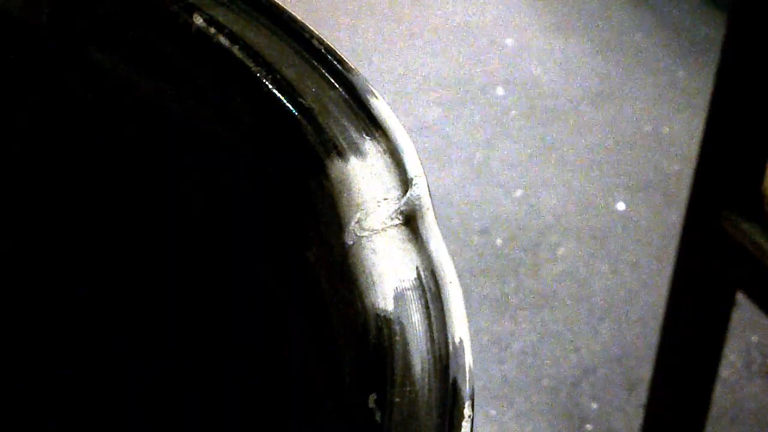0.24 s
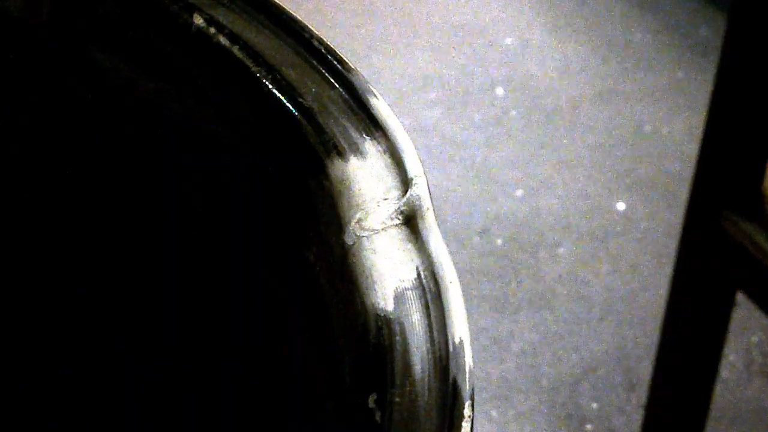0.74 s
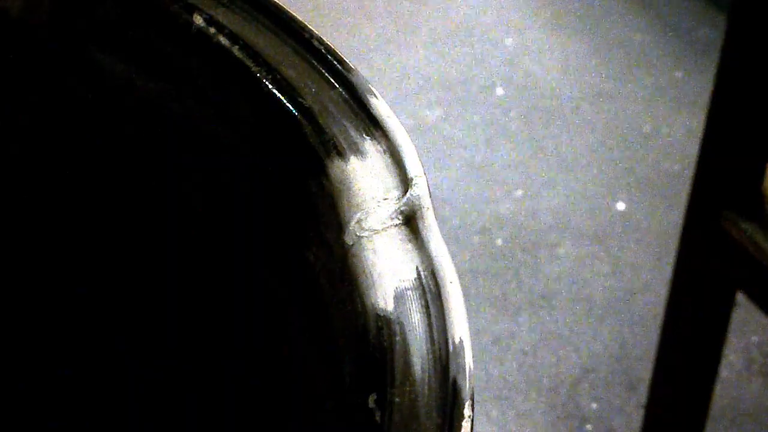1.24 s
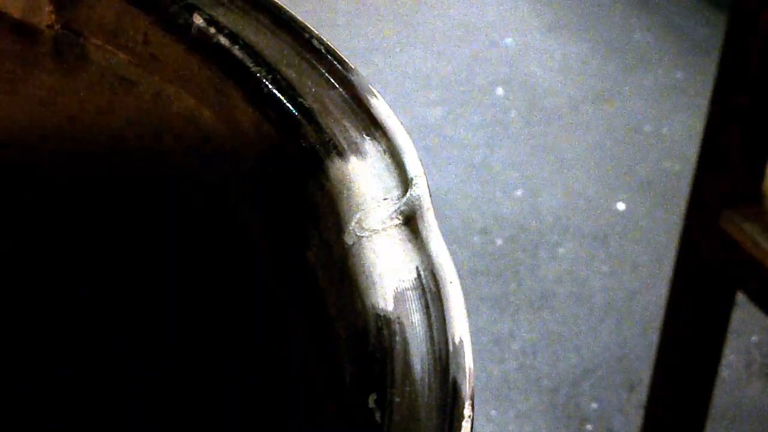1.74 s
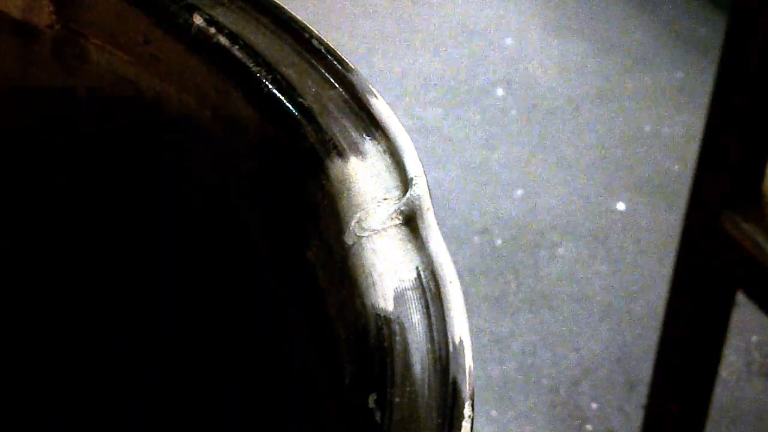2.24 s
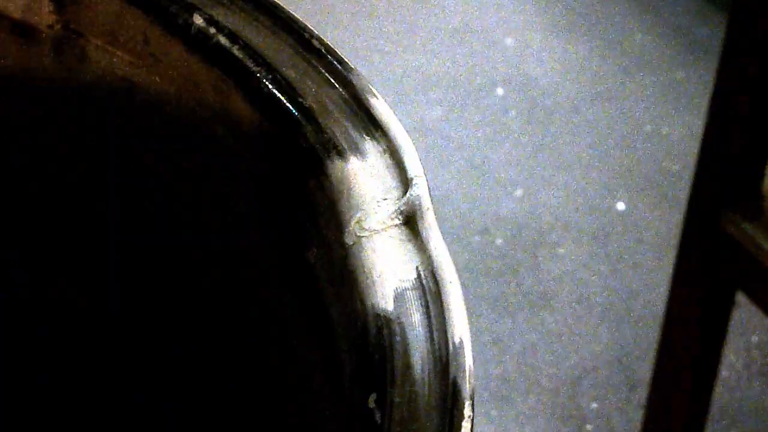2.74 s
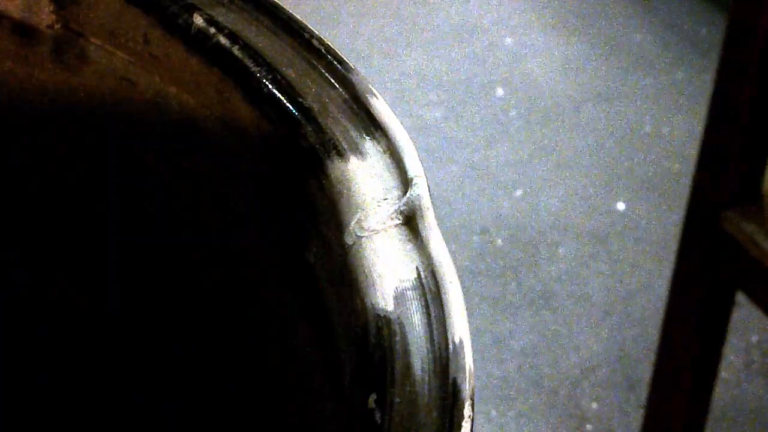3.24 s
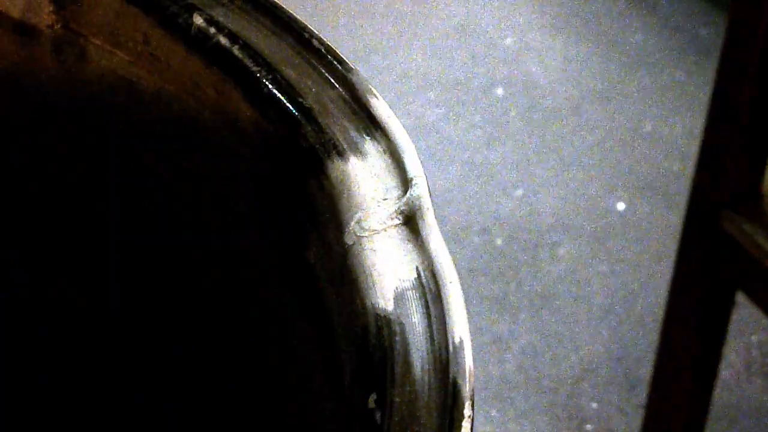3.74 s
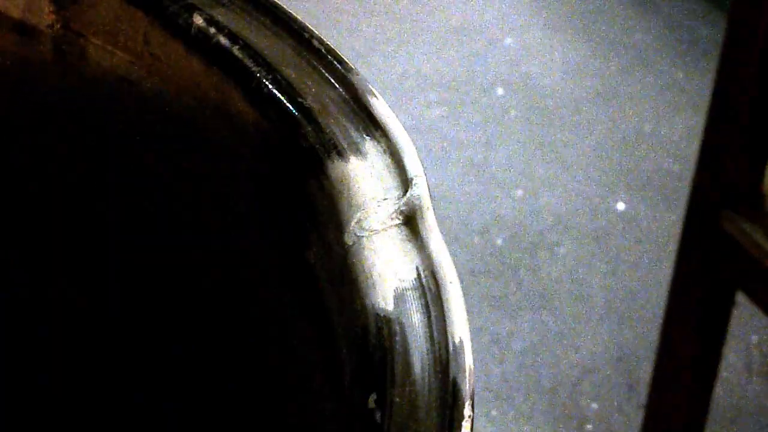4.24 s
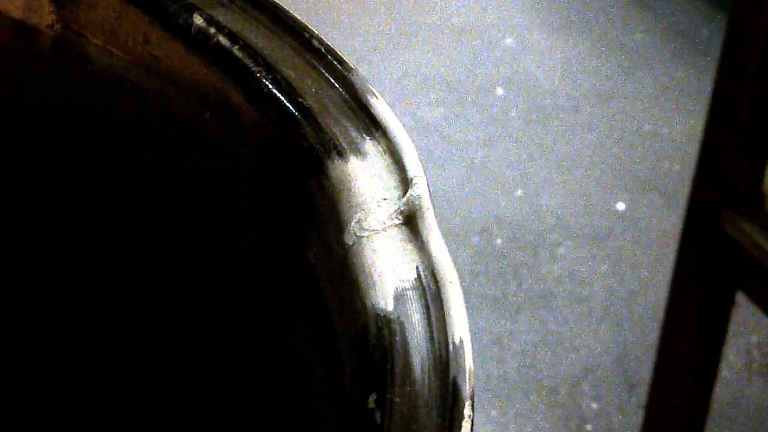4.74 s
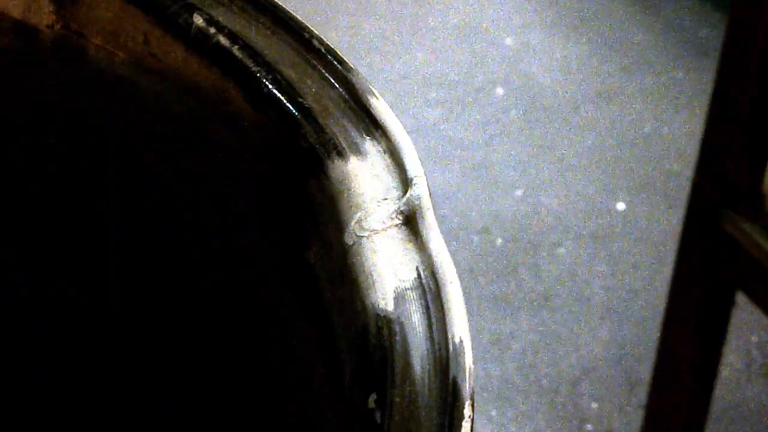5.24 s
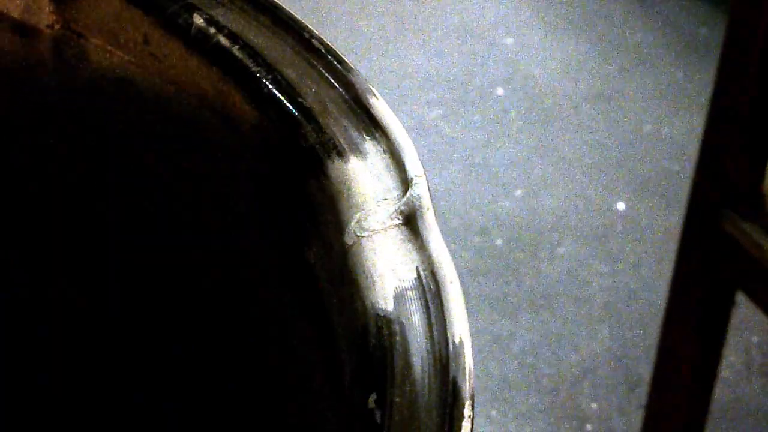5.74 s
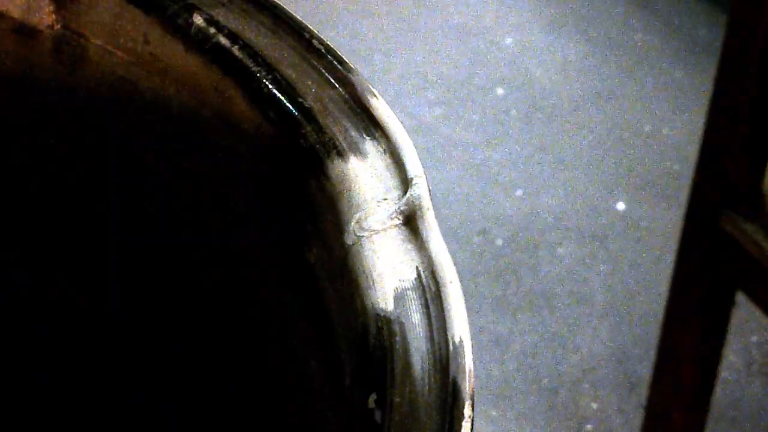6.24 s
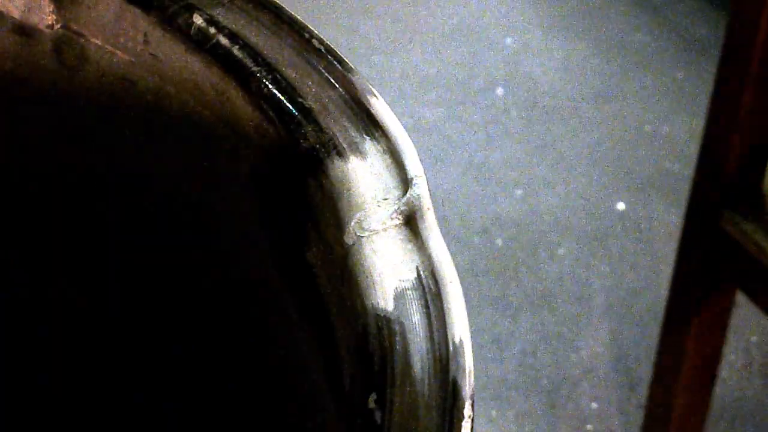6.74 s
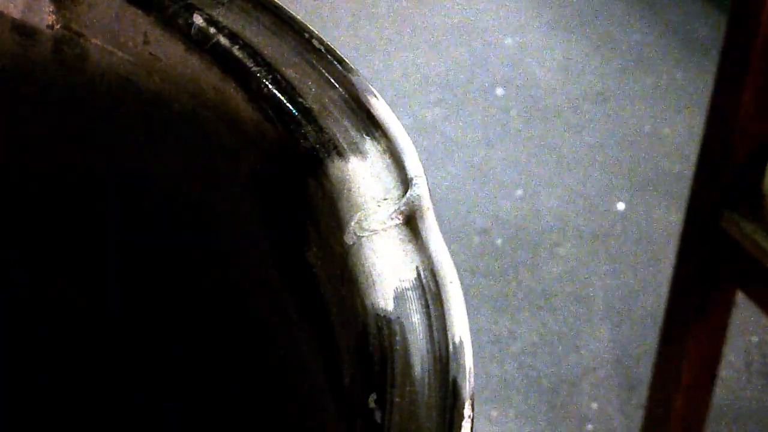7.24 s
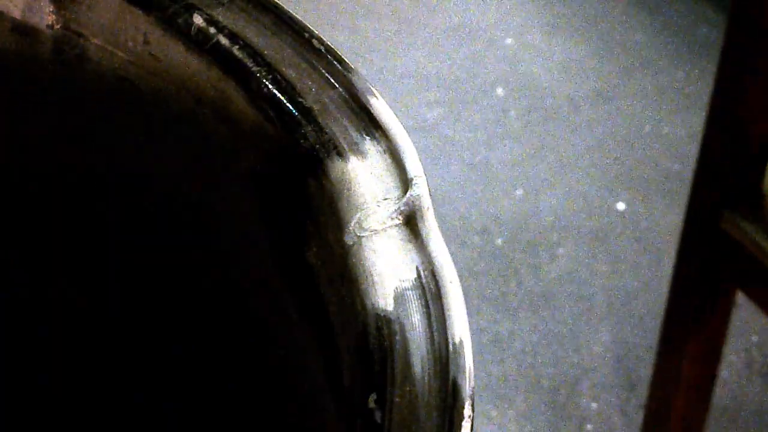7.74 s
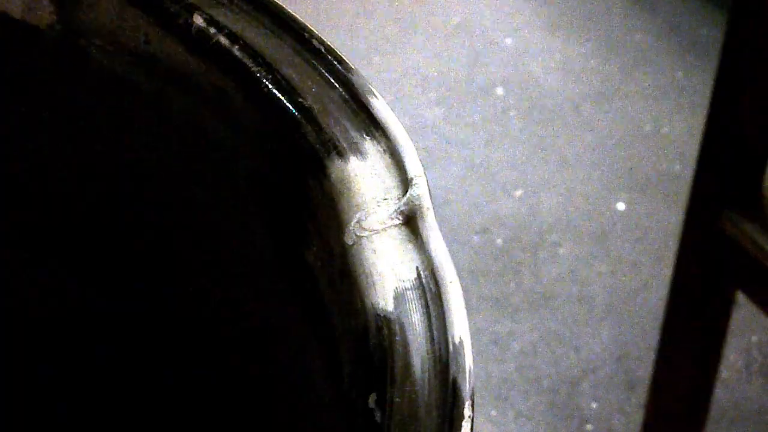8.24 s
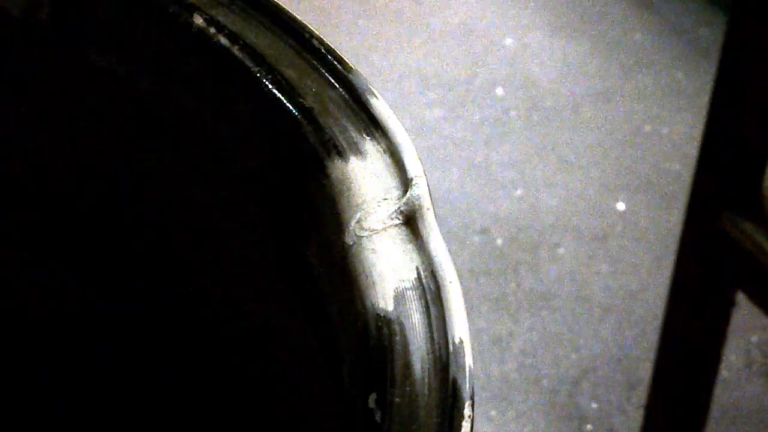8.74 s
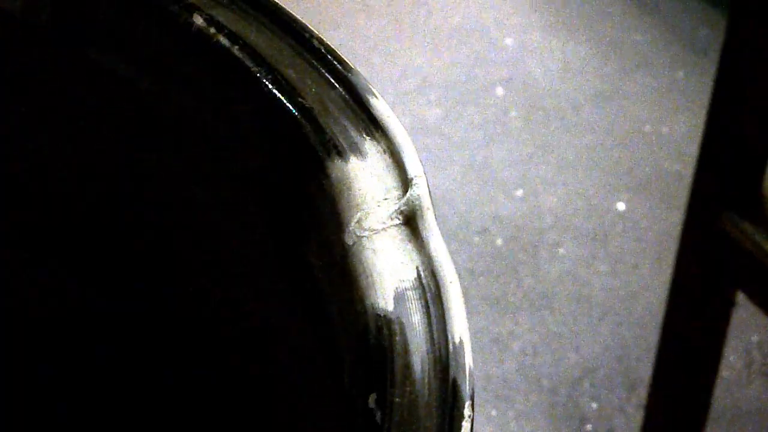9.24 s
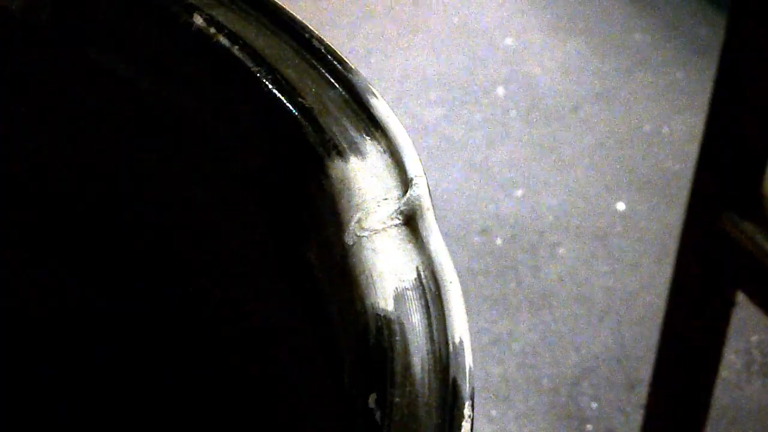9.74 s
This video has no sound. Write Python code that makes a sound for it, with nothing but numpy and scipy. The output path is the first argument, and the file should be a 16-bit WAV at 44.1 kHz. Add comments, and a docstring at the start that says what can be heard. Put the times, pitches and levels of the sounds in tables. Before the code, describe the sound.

A faint hum and room noise fill a workshop, heard through one small microphone. At about 0.5 seconds, gas seeps from a torch tip with a few tiny spurts. At 1.2 seconds it lights with a sharp pop, a crack over a low thump that rings briefly in the room. A soft flame roar follows, along with a thin, rapidly fluttering hiss. The flame sinks until about 2.5 seconds, then recovers and burns steadily with a light fizz from 3.5 seconds. Around 6.3 seconds oxygen opens: the flutter stops, the soft roar fades and a smooth, sharp jet hiss takes over. This hiss grows louder and brighter, stepping up near 8 seconds as a deep roar starts to build underneath. The hiss is loudest from about 9 seconds and holds until the end, near 10 seconds.

```python
"""A workshop, where a gas torch is heard through one small microphone. Fuel spurts from the tip, ringing
its narrow passage, and the gathered gas lights with a pop. A soft turbulent flame roars while the chattering
regulator modulates the fuel hiss. Then oxygen is turned up: the flutter stops, the roar thins, and the jet
hiss grows louder and brighter as its power moves to finer eddies. Near full pressure a deep roar sets in."""
import sys
import numpy as np
from scipy import signal
from scipy.fft import rfft, irfft, next_fast_len
from scipy.io import wavfile

SR = 44100
rng = np.random.default_rng(int(sys.argv[2]) if len(sys.argv) > 2 else 0)


def log_audio(samples):
    """Write samples as a 16-bit WAV file to the path given in sys.argv[1]."""
    # one column per channel
    frames = np.atleast_2d(samples).T
    # limit to full scale, then quantise
    limited = np.clip(frames, -1, 1)
    pcm = np.round(limited * 32767).astype(np.int16)
    wavfile.write(sys.argv[1], SR, pcm)


N = 440118
T = np.arange(N) / SR

FUEL_OPEN_S, LIT_S = 1.09, 1.184
TRICKLE_S, TRICKLE_RISE_S = 5.85, 0.053  # a first trickle of oxygen calms the fizz and the fuel hiss
OXYGEN_S, OXYGEN_OPENING_S = 6.27, 0.145
SHARP_S = 6.352  # the jet turns sharp and the soft roar starts to die away


def undb(db):
    """Amplitude ratio of a level in decibels."""
    return 10 ** (np.asarray(db) / 20)


def unit(x):
    """Normalisation to rms 1."""
    return x / np.sqrt(np.mean(x ** 2))


def ramp(start, length):
    """Linear rise from 0 to 1."""
    return np.clip((T - start) / length, 0, 1)


def decay(start, tau):
    """Exponential decay, held at 1 until start."""
    return np.exp(-np.maximum(T - start, 0) / tau)


def walk(rate):
    """Random fluctuation with a spread near 1 and `rate` turns a second."""
    return np.sqrt(3 / 2) * np.interp(T * rate, np.arange(SR), rng.standard_normal(SR))


def colour(x, spectrum):
    """Spectral shaping: a flat sound takes on the given relative levels, at rms 1."""
    hz, db = np.transpose(sorted(spectrum))
    size = next_fast_len(N)
    f = np.maximum(np.fft.rfftfreq(size, 1 / SR), 1)
    gain = undb(np.interp(np.log(f), np.log(hz), db))
    skirts = np.minimum(f / hz[0], 1) ** 2 * np.minimum(hz[-1] / f, 1) ** 2
    return unit(irfft(rfft(x, size) * gain * skirts, size)[:N])


def noise(spectrum):
    """Stationary noise with a given spectrum."""
    return colour(rng.standard_normal(N), spectrum)


def eddies(spectrum, rate, burst_db):
    """Intermittency: turbulent noise comes in short uneven bursts."""
    return colour(rng.standard_normal(N) * undb(burst_db * walk(rate)), spectrum)


def ringing(modes):
    """Resonance: gas noise excites the modes of a narrow passage."""
    size = next_fast_len(N)
    f = np.fft.rfftfreq(size, 1 / SR)
    power = sum(undb(db) ** 2 / (1 + 2 * ((f - hz) / width) ** 2) ** 2 for hz, width, db in modes)
    return unit(irfft(rfft(rng.standard_normal(size)) * np.sqrt(power))[:N])


def room(x, wet_db, t60):
    """Reverberation: dense, decaying reflections follow the direct sound; power is conserved."""
    t = T[:SR // 2]
    response = rng.standard_normal(len(t)) * np.exp(-np.log(1000) * t / t60) * (t > .004)
    response *= undb(wet_db) / np.linalg.norm(response)
    response[0] = 1
    return signal.fftconvolve(x, response / np.linalg.norm(response))[:N]


# Spectrum of the background. Each row: frequency in Hz, relative level in dB.
BACKGROUND_SPECTRUM = [(25, -8), (70, 3), (115, 15), (220, 7.5), (400, 7.5), (900, 3.5), (2500, 1),
                       (7000, 1), (10300, 0), (11200, -12), (12200, -22)]


def background():
    """The noise floor: room noise, microphone hiss and a machine hum wavering in pitch and level."""
    hum_hz = 110 + 1.145 * walk(5.9)
    hum = np.sqrt(2) * np.sin(2 * np.pi * np.cumsum(hum_hz) / SR)
    return noise(BACKGROUND_SPECTRUM) * undb(-57) + hum * undb(-68.5 + 0.87 * walk(3.5))


# Modes of the fuel passage. Each row: frequency in Hz, width in Hz, relative level in dB.
FUEL_MODES = [(4640, 97, -4), (4875, 106, 1), (5370, 180, -3.5), (5910, 220, 0), (6100, 120, -4),
              (6280, 97, 1), (6750, 94, 3.5), (7610, 98, -3), (8080, 110, -0.5), (8640, 110, -1.5),
              (9030, 93, -5.5), (9300, 110, -11), (9870, 150, -2), (11400, 130, -23)]
# Spectrum of the broadband fuel hiss. Each row: frequency in Hz, relative level in dB.
FUEL_SPECTRUM = [(2500, -22), (4200, -3.5), (5500, -4.5), (7000, 1), (8200, -8.5), (10300, 1), (11000, -11),
                 (12000, -19)]
# Gas seeping at two nudges of the valve. Each row: start in seconds, level in dB.
SEEPS = [(.485, -58), (.6, -53)]
# Spurts as the valve cracks open. Each row: start in seconds, level in dB.
SPURTS = [(.603, -46), (.617, -47), (.643, -51), (.668, -55), (.695, -54)]


def fuel_hiss():
    """Flow noise excites the tip's resonances: fuel seeps, spurts, then puffs until oxygen takes over."""
    hiss = ringing(FUEL_MODES) * undb(-1.77) + noise(FUEL_SPECTRUM) * undb(-4.5)
    seep = sum(undb(db) * ramp(s, 0.01) * decay(s, tau=0.11) for s, db in SEEPS)
    spurts = sum(undb(db) * ramp(s, 0.001) * decay(s + 0.0014, tau=0.0034) for s, db in SPURTS)
    flow_db = -46.5 + 0.1 * flame_strength() - 0.5 * ramp(TRICKLE_S, TRICKLE_RISE_S)
    flow = seep + undb(flow_db) * ramp(FUEL_OPEN_S, 0.15) * (1 - ramp(SHARP_S, 0.28))
    return room(hiss * (spurts + flow * regulator_chatter()), wet_db=-11.5, t60=0.54)


def regulator_chatter(jitter=0.0181, scatter_db=1.27):
    """Amplitude modulation: each beat of the regulator passes one puff, until the oxygen opens."""
    rise, fall = 0.23, 0.48  # shares of a beat
    chatter_hz = (78.15 - 0.27 * T) * (1 + jitter * walk(25))
    beats = np.cumsum(chatter_hz) / SR
    phase = beats % 1
    strength = undb(scatter_db * rng.standard_normal(SR))[beats.astype(int)]
    puffs = unit(strength * np.exp(-phase / fall) * (1 - np.exp(-phase / rise)))
    steady = ramp(OXYGEN_S, OXYGEN_OPENING_S)
    return unit(steady + (1 - steady) * puffs)


# Spectra of the pop and of the room's ring. Each row: frequency in Hz, relative level in dB.
BOOM_SPECTRUM = [(25, -28), (60, -25), (110, 4.5), (180, 0.5), (260, -7), (390, 4.5), (480, -8), (660, 4),
                 (810, -9), (1150, -14.5), (1400, -14), (1800, -15), (2600, -24.5), (4700, -25),
                 (6000, -22), (9000, -33), (12000, -58)]
CRACK_SPECTRUM = [(300, -10), (1200, 2), (2700, 5), (4700, -6), (6000, 3), (7500, -6), (10500, -10),
                  (12000, -30)]
RING_SPECTRUM = [(500, -14), (700, 1), (900, -5), (1300, -5), (1600, -2), (2000, -2), (2600, -14),
                 (3800, -6), (5000, -22)]
# The direct pop and its echo from the walls. Each row: start in seconds, boom level in dB,
# boom decay in seconds, crack level in dB, crack decay in seconds.
POP_ARRIVALS = [(1.183, -9, 0.0065, -17.8, 0.001), (1.2200, -22, 0.039, -47, .025)]


def ignition(burn_s=0.004):
    """Impulsive excitation: the gathered gas flashes with a crack on a low boom, then the room rings."""
    boom, crack = noise(BOOM_SPECTRUM), noise(CRACK_SPECTRUM)
    pop = np.zeros(N)
    for start, boom_db, boom_tau, crack_db, crack_tau in POP_ARRIVALS:
        pop += boom * undb(boom_db) * ramp(start, burn_s) * decay(start + burn_s, boom_tau)
        pop += crack * undb(crack_db) * ramp(start, 0.0014) * decay(start + burn_s, crack_tau)
    tail = noise(BOOM_SPECTRUM) * undb(-21.5) * ramp(LIT_S, 0.017) * decay(LIT_S, tau=0.068)
    ring = noise(RING_SPECTRUM) * undb(-36) * ramp(LIT_S, 0.036) * decay(LIT_S, tau=0.11)
    return pop + tail + ring


# Strength of the fuel flame. Each row: time in seconds, level in dB relative to the full flame.
FLAME_STRENGTH = [(1.42, -2.5), (1.6, -4.5), (2.25, -9), (2.53, -12), (2.65, -5), (2.9, -4.5),
                  (3.55, -0.14), (5.2, 0.1), (5.85, 1.3), (6.08, -1.0), (6.3, 2)]


def flame_strength():
    """The flame's envelope in dB: it sinks after lighting, then the valve is turned up."""
    return np.interp(T, *np.transpose(FLAME_STRENGTH))


# Spectra of the flame's four sounds. Each row: frequency in Hz, relative level in dB.
SOFT_ROAR_SPECTRUM = [(25, -44), (60, -19.5), (120, -6), (175, 0.5), (245, -1), (300, -6), (385, 0.5),
                      (470, -7.5), (550, -1), (660, -4), (770, -11), (1300, -21.5), (3000, -50)]
DEEP_ROAR_SPECTRUM = [(25, -44), (60, -19), (120, -3), (180, 0.5), (240, 1), (300, -8.5), (380, -0.5),
                      (460, -12), (560, -3), (660, -6), (790, -15.5), (2000, -38)]
RUSH_SPECTRUM = [(400, -13), (500, -14), (610, -4), (690, -3.5), (790, -9.5), (920, -1.5), (1080, -1.5),
                 (1240, -3.5), (1390, -12.5), (1800, -6.5), (4000, -43)]
FIZZ_SPECTRUM = [(1300, -17), (1570, 5), (1800, -1.5), (2050, 0.5), (2300, 0.5), (2800, 3.5), (3250, -4),
                 (3600, 1.5), (4050, -7.5), (4600, 3.5), (5300, -14), (10000, -20)]


def flame():
    """Combustion noise: oxygen quiets the flame until, near full pressure, turbulence makes it roar."""
    strength = flame_strength()
    oxygen = ramp(OXYGEN_S, OXYGEN_OPENING_S)
    turbulence = ramp(start=8.08, length=1.42)
    soft_db = -40 - 0.082 * strength ** 2  # holds up until the flame is nearly starved
    soft = eddies(SOFT_ROAR_SPECTRUM, rate=120, burst_db=1.5) * undb(soft_db) * decay(SHARP_S, tau=0.2)
    deep = eddies(DEEP_ROAR_SPECTRUM, rate=120, burst_db=1.0) * undb(-58 + 17.5 * turbulence) * oxygen
    fuel_rush = undb(-46.5 + 1.28 * strength)
    oxygen_rush = np.hypot(swell(peak_db=-45, at_pressure=0.016, drop_db=18), undb(-49) * turbulence)
    rush = eddies(RUSH_SPECTRUM, rate=200, burst_db=1.5)
    rush *= fuel_rush * (1 - oxygen) + oxygen_rush * oxygen
    fizz_db = -49 + 1.86 * strength - 4 * ramp(TRICKLE_S, TRICKLE_RISE_S)
    fizz = eddies(FIZZ_SPECTRUM, rate=300, burst_db=2.0) * undb(fizz_db) * (1 - oxygen)
    return room((soft + deep + rush + fizz) * ramp(LIT_S, 0.029), wet_db=-5.5, t60=0.41)


# The oxygen supply. Each row: time in seconds, share of full pressure.
OXYGEN_PRESSURE = [(6.58, 0.015), (7.3, 0.31), (7.9, .42), (8.1, 0.58), (9.2, .98), (9.95, 1.02)]


def pressure():
    """The jet's driving pressure, raised by hand with a quick twist part way."""
    return np.interp(T, *np.transpose(OXYGEN_PRESSURE))


def swell(peak_db, at_pressure, drop_db):
    """Parabolic level law: an eddy size peaks at its own pressure, drop_db lower one full pressure away."""
    return undb(peak_db - drop_db * (pressure() - at_pressure) ** 2)


# Spectra of the jet's eddies, largest first. Each row: frequency in Hz, relative level in dB.
BILLOW_SPECTRUM = [(700, -24.5), (1200, 0), (1390, -9), (1600, 1.5), (1900, 2.5), (2300, -6), (3200, -15)]
COARSE_SPECTRUM = [(1300, -35), (1650, -15.5), (2000, -2.5), (2280, -1), (2480, -5.5), (2780, 4.5),
                   (3080, 1.5), (3230, -3.5), (3600, 0), (4400, -10), (4580, 2.5), (4900, -16), (6000, -25)]
CORE_SPECTRUM = [(2800, -18), (3600, -14), (4300, -1), (5200, -0.5), (6300, -5), (7400, -7.5), (8200, -27)]
FINE_SPECTRUM = [(4400, -25), (4750, 1.5), (5050, -1), (5250, -15), (6400, 0.5), (6850, 7), (7400, -5.5),
                 (7950, -5), (8450, 3), (8750, -1), (8950, -6), (9450, -0.5), (9750, -4.5), (10620, -6.5),
                 (11000, -16), (11500, -15.5), (12200, -37)]
# Modes of the oxygen passage. Each row: frequency in Hz, width in Hz, relative level in dB.
OXYGEN_MODES = [(3670, 33, -8), (3890, 310, -4), (4525, 90, 0), (4626, 175, 3.5), (5160, 200, -7),
                (5550, 290, -2), (5920, 170, -2), (6240, 300, -0.5), (6480, 140, -1), (7500, 130, -28),
                (7330, 110, -3)]


def oxygen_jet():
    """Turbulent jet noise: as the flow speeds up, the power moves from coarse eddies to fine ones."""
    billow = eddies(BILLOW_SPECTRUM, rate=330, burst_db=0.5)
    billow *= swell(peak_db=-38.5, at_pressure=0.28, drop_db=13)
    coarse = eddies(COARSE_SPECTRUM, rate=510, burst_db=1.0)
    coarse *= swell(peak_db=-31.5, at_pressure=0.74, drop_db=11.4)
    core = ringing(OXYGEN_MODES) * undb(-2.5) + eddies(CORE_SPECTRUM, rate=500, burst_db=3.0) * undb(-7.5)
    core *= swell(peak_db=-21.5, at_pressure=1.305, drop_db=8.1)
    fine = noise(FINE_SPECTRUM) * undb(-39 + 17 * pressure())
    flicker = undb(0.32 * walk(35) + 0.98 * walk(350))
    opening, sharp = ramp(OXYGEN_S, OXYGEN_OPENING_S), ramp(SHARP_S, 0.075)
    hiss = billow * opening + coarse * opening ** 2 + (core + fine) * sharp
    return room(hiss * flicker, wet_db=-4.5, t60=0.32)


def scene():
    """Superposition: the sources add at one microphone, the same in both channels."""
    return np.tile(background() + fuel_hiss() + ignition() + flame() + oxygen_jet(), (2, 1))


def record(dry):
    """Frequency response: the microphone has a narrow treble notch and a steep cut at the top."""
    notch_hz, width_hz, cutoff_hz = 7690, 175, 12000
    notched = signal.lfilter(*signal.iirnotch(notch_hz, notch_hz / width_hz, fs=SR), dry)
    return signal.sosfilt(signal.ellip(10, .2, 80, cutoff_hz, fs=SR, output="sos"), notched)


dry = scene()
out = record(dry)
log_audio(out)
```